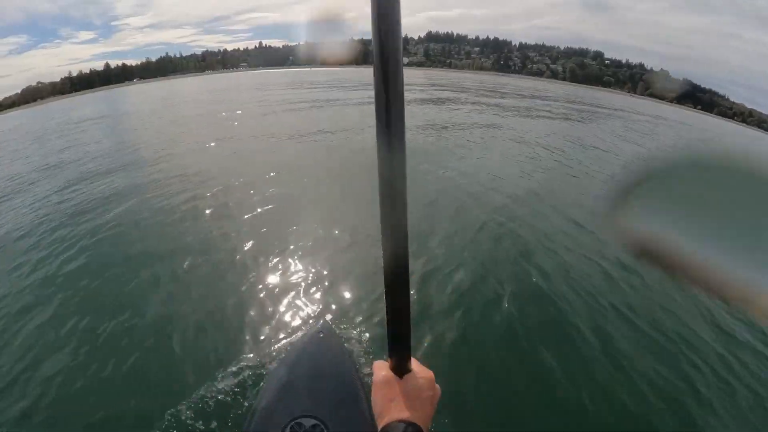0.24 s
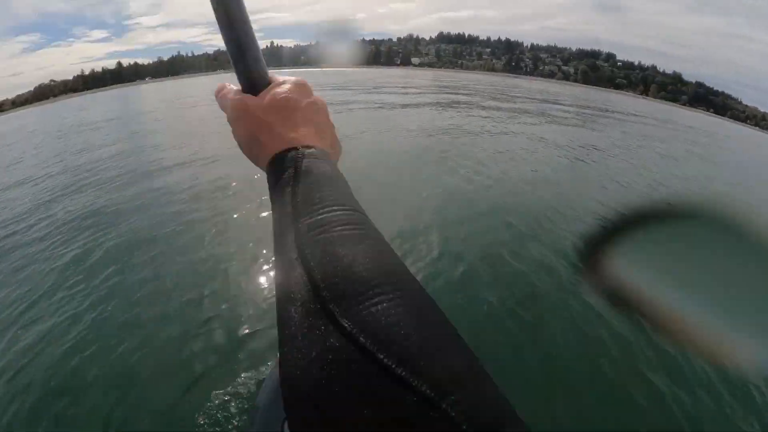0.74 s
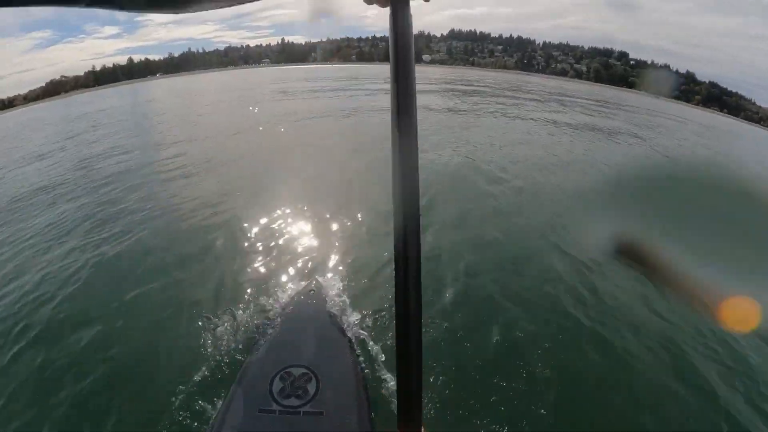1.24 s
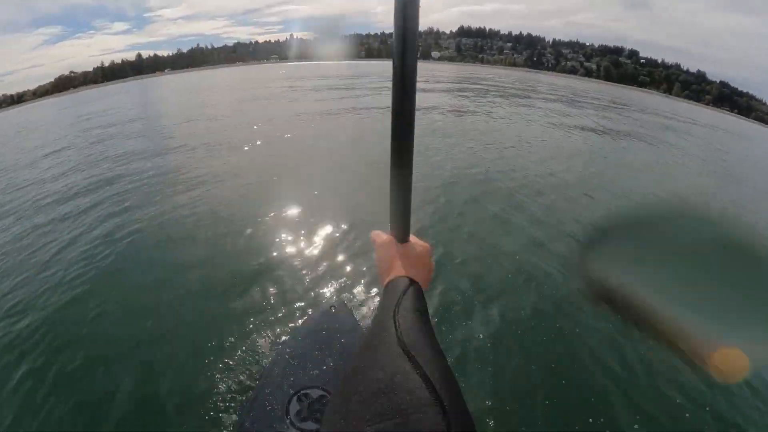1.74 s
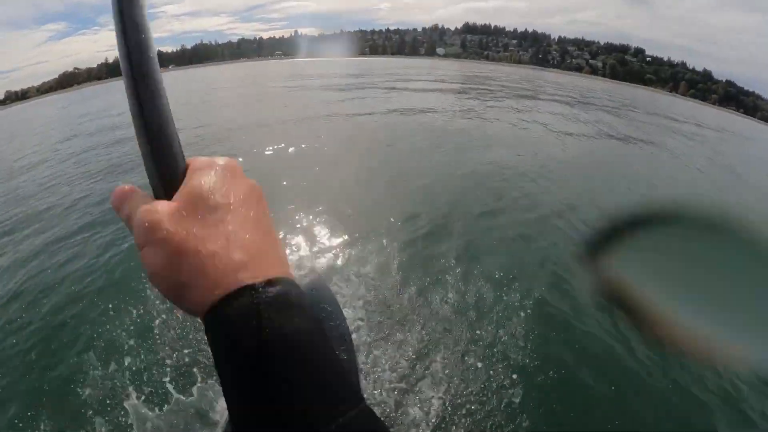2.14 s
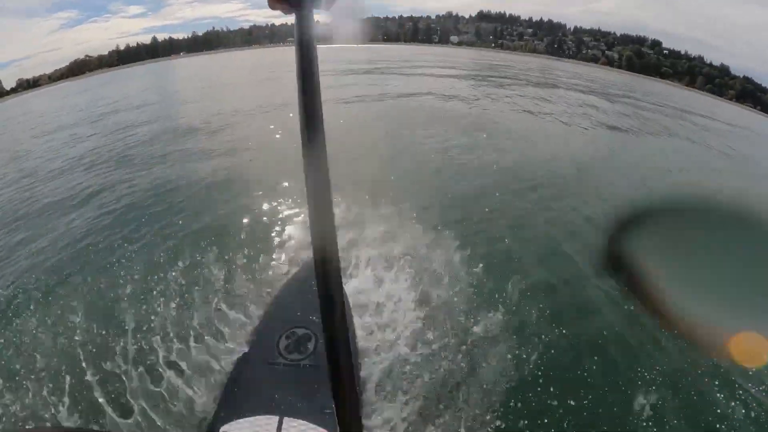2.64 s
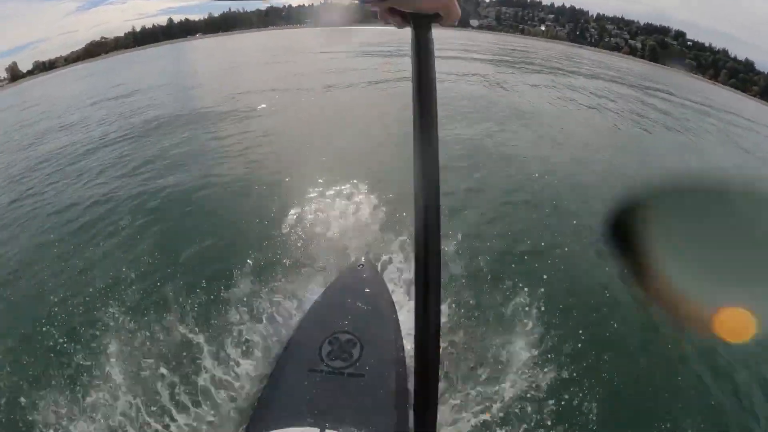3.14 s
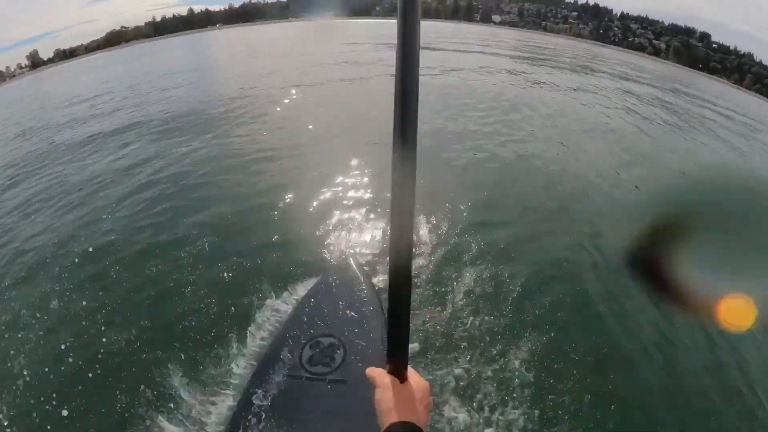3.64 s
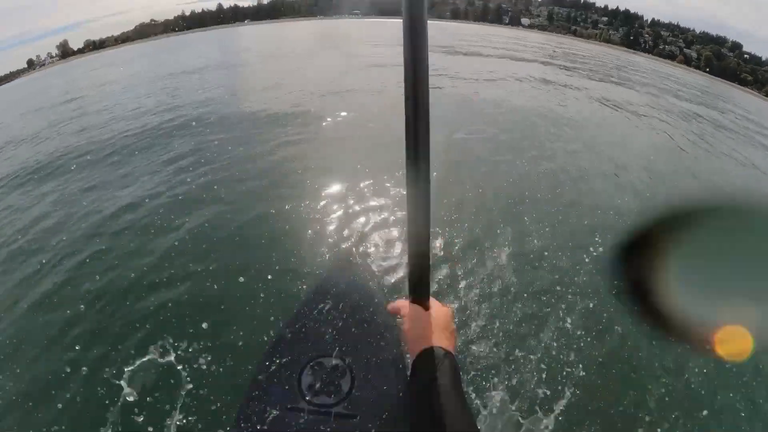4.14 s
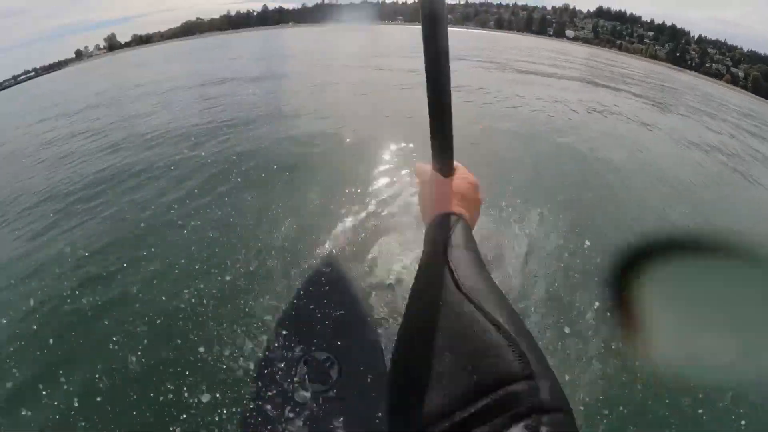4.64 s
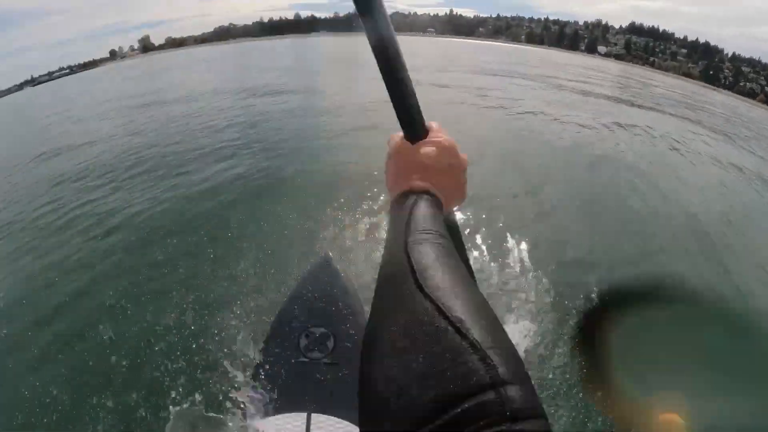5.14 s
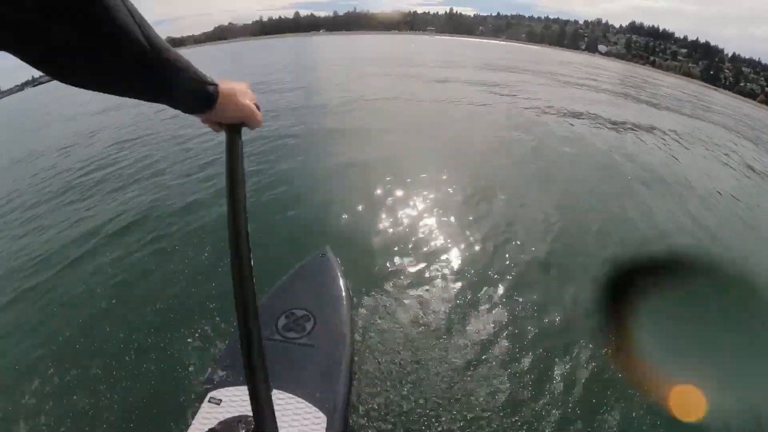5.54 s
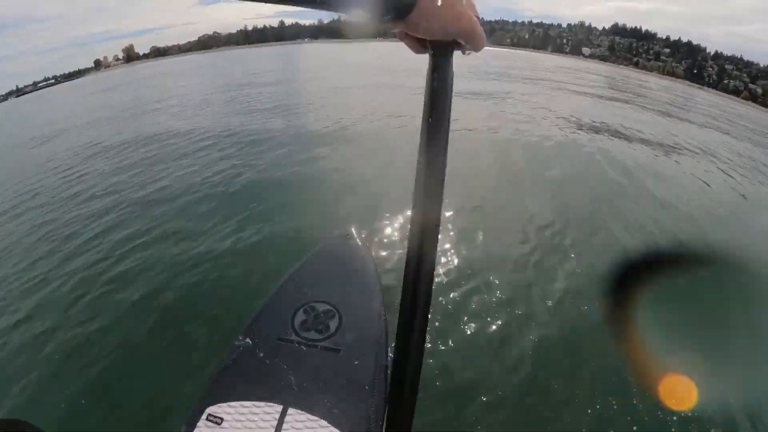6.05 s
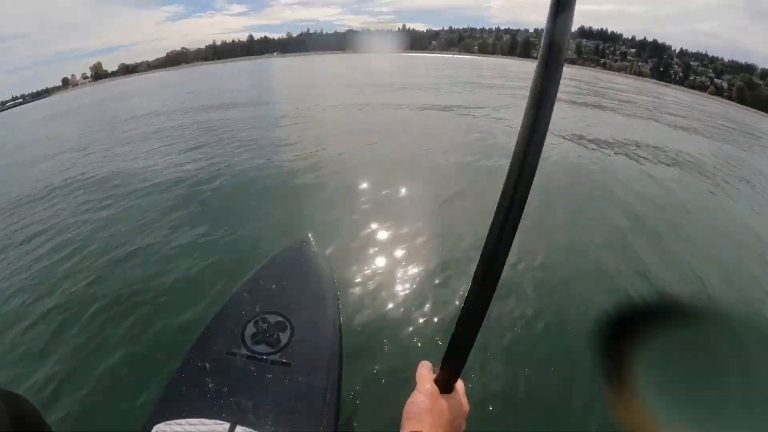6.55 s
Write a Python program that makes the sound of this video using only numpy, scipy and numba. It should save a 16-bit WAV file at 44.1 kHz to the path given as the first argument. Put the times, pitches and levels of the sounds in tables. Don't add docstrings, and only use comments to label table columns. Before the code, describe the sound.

Close, dull bow wash with deep paddle gulps and ringing air pockets, small droplet ticks, faint spray crackle and soft wind buffeting.

```python
import sys
import numpy as np
from scipy import signal
from scipy.fft import rfft, irfft
from scipy.io import wavfile
from scipy.ndimage import uniform_filter1d
from numba import njit

SR = 44100
rng = np.random.default_rng(int(sys.argv[2]) if len(sys.argv) > 2 else 0)


def voltage_ratio(decibels):
    exponent = np.asarray(decibels, float) / 20
    return 10 ** exponent


def bounce(signal):
    frames = np.transpose(np.atleast_2d(signal))
    limited = np.clip(frames, -1, 1)
    pcm = np.round(limited * 32767).astype(np.int16)
    wavfile.write(sys.argv[1], SR, pcm)


N = 299439


def unit(x):
    return x / np.sqrt(np.mean(x ** 2))


def curves(table):
    s, *columns = np.transpose(table)
    return [np.interp(np.arange(N) / SR, s, c, -140, -140) for c in columns]


def response(points):
    hz = np.arange(N // 2 + 1) * SR / N + 1e-3
    point_hz, point_db = np.transpose(points)
    return hz, voltage_ratio(np.interp(np.log(hz), np.log(point_hz), point_db, -150, -150))


def walk(rate):
    hold = int(SR / rate)
    steps = np.repeat(rng.standard_normal(N // hold + 1), hold)
    return unit(uniform_filter1d(uniform_filter1d(steps, hold), hold)[:N])


def surge(s, peak, length, rise):
    out = np.zeros(N)
    for start, a, decay in zip(s, peak, np.maximum(length, .003)):
        i = int(start * SR)
        t = np.arange(min(int(6 * decay * SR), N - i)) / SR
        attack = (1 - np.exp(-t / rise)) ** 2
        out[i:i + len(t)] += a * a * attack * np.exp(-2 * (t / decay) ** 2)
    return out


def swell(s, db, half_s):
    t = np.arange(N) / SR
    return sum(voltage_ratio(2 * a) * np.exp(-((t - centre) / w) ** 2) for centre, a, w in np.broadcast(s, db, half_s))


@njit
def bubbles(s, hz, cycles, size, glide, swell):
    out = np.zeros(N)
    for k in range(len(s)):
        tau = cycles[k] * SR / hz[k] / 3
        phase = 0.
        i0 = int(s[k] * SR)
        for i in range(min(int(5 * tau), N - i0)):
            phase += 2 * np.pi * hz[k] / SR * (1 + glide * i / (3 * tau))
            envelope = np.exp(-i / tau) * (1 - np.exp(-i / (swell * tau)))
            out[i0 + i] += size[k] * np.sin(phase) * envelope
    return out


def foam(count, lo_hz, hi_hz, cycles, scatter_db):
    when, pitch, strength, ringing = rng.random((count, 4)).T
    hz = (np.sqrt(lo_hz) + (np.sqrt(hi_hz) - np.sqrt(lo_hz)) * pitch) ** 2
    size = hz ** .45 * voltage_ratio(scatter_db * strength ** 2)
    return unit(bubbles(when * N / SR, hz, cycles * (.5 + ringing), size, 0.19, 0.57))


def water():
    # low_hz, high_hz
    zones_hz = [(75, 160), (160, 600), (600, 2000), (2000, 6000)]
    # point_hz, density_db (per
    # Hz)
    wash_colour = [(62, 3), (125, -6.5), (229, -3.5), (361, -2), (736, -11), (954, -13.5), (1260, -21.5),
                   (2000, -31.5), (2350, -36.5), (2850, -40), (3150, -44.5), (3800, -45), (4250, -57.5),
                   (7300, -66.5), (8800, -88.5)]
    # start_s, gurgle_db, fizz_db (against gurgle), length_s
    splashes = [(0.108, -34.5, -18, 0.091), (1.135, -32, -9, 0.024), (1.826, -18.5, -25, 0.03),
                (1.845, -15.5, -27.5, 0.037), (1.927, -13.5, -26.5, 0.034), (2.485, -18.5, -28, 0.076),
                (2.513, -26, -12.5, 0.034), (2.578, -15, -28, 0.025), (2.862, -18, -20, 0.015),
                (2.891, -13.5, -19.5, 0.022), (2.909, -17.5, -21, 0.034), (3.025, -21.5, -28, 0.049),
                (3.104, -18, -24, 0.042), (3.71, -23, -26, 0.042), (3.771, -24.5, -19.5, 0.06),
                (4.02, -20, -27, 0.035), (4.035, -15, -18, 0.042), (4.284, -16, -22.5, 0.046),
                (4.29, -21, -33, 0.024), (4.607, -17.5, -19.5, 0.03), (4.67, -32, -17, 0.099),
                (4.85, -27, -16, 0.035), (4.909, -24, -19, 0.041), (4.938, -26.5, -17, 0.039),
                (5.491, -29, -14, 0.031), (5.617, -20, -30, 0.058), (5.661, -27, -22, 0.038),
                (6.114, -18.5, -20.5, 0.037), (6.153, -22.5, -22, 0.065), (6.331, -25, -21, 0.038),
                (0.931, -26.5, -14, 0.057), (1.066, -29, -13, 0.026), (5.518, -27, -26, 0.05),
                (6.525, -22, -15.5, 0.018)]
    # start_s, gurgle_db, fizz_db (against gurgle)
    ticks = [(0.3152, -46, 0.5), (0.382, -31, -25), (0.428, -29, -22), (0.462, -35.5, -12), (0.684, -50, 0),
             (0.816, -45, -6), (0.9032, -31, -13), (0.957, -35, -14), (1.068, -33, -17),
             (1.3982, -38.5, -11), (1.5094, -44, 0), (1.552, -31.5, -13.5), (1.81, -29, -20),
             (2.339, -20.5, -28), (2.5127, -29, -16), (2.409, -25, -21), (2.826, -30, -22),
             (2.866, -21, -31), (2.8922, -17, -25), (2.898, -16.5, -24), (3.013, -28, -25),
             (3.034, -24, -28), (3.083, -32, -22), (3.655, -32, -17), (4.052, -23, -17), (1.936, -27, -26),
             (6.516, -37, -18), (6.762, -30, -22), (3.569, -20, -40), (3.717, -24.5, -23),
             (4.0427, -31, -24), (4.2793, -28, -22), (4.608, -27.5, -25), (5.963, -25, -27),
             (5.4091, -35, -16), (6.119, -25, -16), (6.262, -28, -19), (6.642, -31.5, -14.5)]
    # centre_s, level_db, half_length_s, centre_hz, half_width_hz
    clearings = [(5.1, 5.5, 0.56, 4300, 350), (1.05, -1.5, 0.42, 5200, 730), (4.3, 2.5, 0.17, 4300, 400),
                 (6.25, -0.5, 0.12, 2800, 250)]

    s, low_db, _, length = slaps()
    bursts = [surge(s, voltage_ratio(db), length, 0.0034) for db in (low_db - 18.0, low_db - 8.5)]
    s, mid_db, high_db, length = np.transpose(splashes)
    bursts += [surge(s, voltage_ratio(db), length, 0.0066) for db in (mid_db - 3.0, mid_db + high_db - 4.0)]
    s, mid_db, high_db = np.transpose(ticks)
    tick_s, tick_rise_s = 0.01 + 0 * s, 0.0015
    bursts[2] += surge(s, voltage_ratio(mid_db + 2.0), tick_s, tick_rise_s)
    bursts[3] += surge(s, voltage_ratio(mid_db + high_db + 3.5), tick_s, tick_rise_s)

    hz, gain = response(wash_colour)
    crowd = foam(count=13000, lo_hz=119.87, hi_hz=6008.0, cycles=12.22, scatter_db=11.0)
    source = rfft(0.93 * rng.standard_normal(N) + 0.51 * crowd) * gain
    power = np.abs(source) ** 2 * 2 / N ** 2
    zone_db = []
    for (lo, hi), flow, burst in zip(zones_hz, wash(), bursts):
        zone_power = power[(hz > lo) & (hz < hi)].sum()
        zone_db.append(10 * np.log10((flow + burst) / zone_power))

    out = 0
    shared = walk(24.916)
    for centre in 60 * 2 ** (np.arange(16) / 2):
        mask = np.cos(np.pi / 2 * np.clip(2 * np.log2(hz / centre), -1, 1)) ** 2
        place = np.interp(np.log(centre), np.log([110, 300, 1000, 3000]), np.arange(4))
        j = min(int(place), 2)
        db = zone_db[j] + (place - j) * (zone_db[j + 1] - zone_db[j])
        flicker_db = 0.85 * shared + 1.32 * walk(14)
        out = out + irfft(source * mask, N) * voltage_ratio(db + flicker_db)
    for s, db, half, centre_hz, width_hz in clearings:
        edge = irfft(source * np.exp(-((hz - centre_hz) / width_hz) ** 2), N)
        out = out + edge * voltage_ratio(zone_db[3]) * np.sqrt(swell(s, db, half))
    return out


def wash():
    # time_s, level_db, brightness_db
    flow = [(0, -40, 3.5), (0.24, -43.5, 7.5), (0.72, -36, -1), (1.2, -35.5, 1.5), (1.5, -31.5, -1.5),
            (2.0, -34, -1), (2.4, -34, 1), (2.76, -35.5, 0.5), (3.27, -34, -4.5), (3.5, -35.5, 1),
            (4.0, -38.5, 2), (4.45, -39, 2.5), (4.75, -36.5, 1), (5.33, -40, 1.5), (5.9, -40.5, 3.5),
            (6.25, -40, -6), (6.6, -38, 0.5), (6.79, -38.5, 8)]
    flow_db = (-7.5, 2, 0.5, -18.5)
    bright_share = (0.19, -0.19, .05, 0.9)
    # centre_s, churn_db, gurgle_db (against churn), half_length_s
    swirls = [(0.43, -29, -12.5, 0.16), (0.994, -33, 8, 0.049), (1.32, -31, 2.5, 0.081),
              (1.88, -31, -13, 0.069), (2.208, -34, 2, 0.11), (2.592, -23.5, -16.5, 0.088),
              (3.127, -23, -4.5, 0.053), (3.718, -35.5, 4.5, 0.088), (3.86, -31, -13, 0.1),
              (4.217, -26.5, -3, 0.039), (4.454, -33.5, -17, 0.11), (5, -34, 2.5, 0.063),
              (5.53, -31.5, 3, 0.041), (5.639, -17.5, -17, 0.062), (6.072, -26, -22, 0.019),
              (6.239, -25, -0.5, 0.082), (6.356, -33, 4, 0.078), (6.782, -49, 9, 0.026)]
    # centre_s, level_db
    thuds = [(0.5, -26.5), (0.72, -29), (1.06, -33), (1.63, -32.5), (1.92, -24.5), (2.6, -35),
             (2.89, -27.5), (3.14, -22.5), (3.57, -33), (3.72, -28.5), (4.03, -28), (4.31, -22),
             (4.97, -29), (5.53, -27), (6.13, -25.5), (6.44, -24.5), (6.73, -27)]

    level, bright = curves(flow)
    thud, churn, gurgle, fizz = (voltage_ratio(2 * (level + db + share * bright))
                                 for db, share in zip(flow_db, bright_share))
    s, db, gurgle_db, half = np.transpose(swirls)
    froth = swell(s, db + gurgle_db, half)
    thud = thud + swell(*np.transpose(thuds), half_s=0.043)
    churn = churn + swell(s, db, half)
    return thud, churn, gurgle + froth, fizz + froth * voltage_ratio(2 * -24)


def slaps():
    # start_s, level_db, pitch_hz, length_s
    gulps = [(1.044, -11, 121, 0.017), (1.829, -13, 372, .03), (1.855, -5.5, 336, .036),
             (1.928, -8.5, 218, 0.032), (2.495, -14.5, 518, .035), (2.523, 2, 223.5, 0.0384),
             (2.581, -13.5, 448, 0.03), (3.108, -4.5, 277, 0.025), (3.136, -5, 300, 0.027),
             (3.655, -10, 203, 0.0083), (3.716, 0, 290, 0.015), (3.775, -11, 324, 0.037),
             (4.289, -16, 368, 0.02), (4.302, -0.5, 200, 0.02), (4.865, -7.5, 227, 0.031),
             (4.919, -19.5, 248, .033), (4.946, 1, 231, 0.02), (4.99, -10, 350, 0.02),
             (5.519, -14, 350, .03), (5.631, -19, 288, 0.033), (5.644, -11.5, 520, 0.036),
             (6.031, -13, 404, 0.029), (6.124, -8, 439, 0.0256)]
    # start_s, level_db, pitch_hz
    laps = [(1.292, -21, 440), (0.149, -15, 378), (0.334, -17, 148), (0.536, -18.5, 428), (0.904, -15, 200),
            (1.141, -15, 290), (2.422, -17, 447), (2.859, -32, 570), (2.889, -31, 544), (3.026, -29, 123),
            (3.208, -19, 560), (4.015, -17, 486), (4.039, -24, 625), (4.526, -15.5, 490),
            (4.605, -19.5, 577), (5.071, -13.5, 169), (5.099, -16, 217), (5.496, -16, 245),
            (5.981, -19, 163), (6.258, -12.5, 500)]
    s, db, hz = np.transpose(laps)
    lap_s = 0.03 + 0 * s
    return np.hstack([np.transpose(gulps), np.array([s, db, hz, lap_s])])


def pockets():
    # start_s, level_db, pitch_hz, ringing_cycles
    plops = [(0.5295, -14.5, 960, 9.6), (0.709, -16.5, 755, 12), (1.006, -7.5, 826, 5.2),
             (1.122, -14, 772, 14), (1.142, -7, 776, 5.9), (1.666, -13, 924, 23), (1.743, -11, 580, 5),
             (0.982, -12.5, 510, 12), (1.526, -14, 616, 10), (1.83, -16, 713, 6), (1.934, -14, 630, 5.4),
             (2.865, -9, 562, 8.6), (3.11, -13.5, 616, 8.1), (3.714, -17, 624, 5), (3.886, -20, 810, 7.6),
             (4.61, -12, 602, 8.2), (4.916, -20, 770, 8), (6.027, -17, 480, 5), (6.516, -14, 560, 6),
             (2.009, -13.5, 820, 9.5), (2.207, -15.5, 920, 8.3), (2.243, -16, 933, 12),
             (2.283, -18, 880, 5), (2.339, -13, 930, 24), (2.381, -15.5, 805, 11), (2.713, -22, 834, 16),
             (2.9, -13.5, 963, 43), (3.034, -13, 820, 4), (3.312, -13.5, 830, 7.7), (3.571, -27, 543, 8.1),
             (5.4555, -19.5, 1076, 18), (5.561, -10, 920, 16), (5.624, -15, 1000, 10),
             (5.917, -14, 940, 4.8), (6.052, -14.5, 663, 7), (6.12, -8.5, 937, 12), (6.3397, -22, 913, 32),
             (1.866, -7.5, 370, 6.9), (1.94, -10, 377, 7), (1.95, -13, 704, 6), (2.296, -12.5, 500, 7),
             (2.428, -17, 448, 11.6), (4.303, -5.5, 299, 5.7), (4.31, -11, 478, 7.4), (4.915, -13, 244, 8),
             (5.16, -37, 3400, 17), (5.67, -14, 331, 9), (6.142, -7.5, 383, 8), (6.19, -16, 800, 10),
             (0.104, -22.5, 335, 16), (0.41, -17, 189, 9), (0.455, -15.5, 121, 9.8), (1.874, -8, 193, 6),
             (2.375, -17.5, 225, 6.4), (3.475, -18, 45, 3.7), (3.576, -14, 209.5, 14), (3.93, -20, 432, 35),
             (4.868, -10.5, 225, 23), (5.568, -8, 354, 14), (5.635, -14, 279, 19)]
    # start_s, level_db, pitch_hz
    plinks = [(0.818, -32, 1750), (0.9033, -26.5, 1870), (1.1418, -33.5, 1810), (2.151, -23.5, 1300),
              (2.3443, -22, 1430), (2.872, -27, 2000), (2.8992, -12.5, 1470), (2.925, -29.5, 1950),
              (0.3805, -42, 1460), (2.908, -24, 1500), (1.068, -36, 1440), (1.8108, -30.5, 1320),
              (2.513, -28, 1480), (2.826, -31, 1410), (2.865, -23, 1380), (3.0001, -33, 1360),
              (3.0125, -28.5, 1590), (3.034, -27, 1450), (4.6083, -29, 1340), (5.6255, -32, 1420),
              (6.762, -29, 1370), (3.7733, -45, 3290), (5.793, -36.5, 1820), (5.9866, -25.5, 1230),
              (6.119, -44, 3240), (6.2653, -25, 1710)]

    s, db, hz, length = np.repeat(slaps(), repeats=4, axis=1)
    count = len(s) // 4
    delay, detune = rng.random((len(s), 2)).T
    when = s + length * np.tile([0.01, .12, .35, .7], count) * (.7 + .6 * delay)
    size = voltage_ratio(db + np.tile([3.0, -12.5, -1.5, -14.0], count))
    hz = hz * np.tile([1.015, 1.6, .9, 1.3], count) * (0.899 + 0.14 * detune)
    rings = bubbles(when, hz, .5 * length * hz + 0.69, size, 0.12, 0.38)
    s, db, hz, cycles = np.array(plops).T
    rings = rings + bubbles(s, hz, cycles, voltage_ratio(db + 1.5), 0.092, 0.43)
    s, db, hz = np.transpose(plinks)
    plink_s = 0.008
    rings = rings + bubbles(s, hz, plink_s * hz, voltage_ratio(db + 6.5), 0.051, 0.2)
    return signal.sosfilt(signal.butter(4, 4200, fs=SR, output="sos"), rings)


def droplets():
    # start_s, level_db, pitch_hz
    drips = [(0.1331, -41, 2270), (0.2992, -43.5, 2090), (0.4604, -40, 2680), (0.7876, -34, 2200),
             (0.818, -41, 2020), (0.9028, -23, 2030), (1.069, -36, 2210), (1.1418, -32, 2200),
             (1.1927, -39, 2500), (1.3259, -28, 2090), (1.6312, -42, 2200), (1.8537, -35, 2000),
             (2.1121, -35, 2000), (2.2428, -40, 2250), (2.3451, -33, 2110), (2.3999, -34, 2210),
             (2.4244, -30, 2080), (2.4887, -40.5, 2090), (2.5132, -41, 2590), (2.7656, -37, 2070),
             (2.8654, -23, 2110), (2.8973, -22, 2160), (2.9248, -37, 2000), (3.033, -41, 2010),
             (3.7733, -38, 2290), (3.7853, -30.5, 2030), (4.0432, -27, 2020), (4.2951, -38, 2010),
             (4.6084, -32, 2020), (4.6668, -33, 2040), (4.8599, -43, 2060), (4.8753, -33.5, 2160),
             (5.1597, -49, 2060), (5.5114, -41, 2050), (5.9638, -42, 2120), (6.109, -39, 3050),
             (6.1205, -31, 2790), (6.2637, -32, 2600), (6.5326, -44, 2100), (6.6413, -41, 2210)]
    # start_s, level_db, pitch_hz
    pings = [(0.1042, -59, 4200), (0.194, -64, 4250), (0.3132, -59, 4350), (0.3416, -53, 4230),
             (0.417, -57, 4200), (0.7677, -58, 4240), (0.7816, -52, 4480), (0.823, -56, 4820),
             (0.9028, -57, 4450), (0.9373, -53, 4300), (0.9547, -46, 4390), (0.9767, -56, 4330),
             (1.1418, -56, 4730), (1.3833, -59, 4460), (1.3977, -49, 5290), (1.502, -43, 4270),
             (1.5549, -58, 4400), (1.92, -58, 4200), (2.5122, -56, 4330), (2.8674, -56, 4580),
             (2.8998, -57, 4220), (3.0629, -58, 4230), (3.7174, -58, 4310), (4.0243, -62, 4370),
             (4.0397, -54, 4380), (4.0517, -43, 4180), (4.2961, -50, 4620), (4.372, -58, 4220),
             (4.6109, -57, 4590), (4.6229, -52, 4270), (4.9741, -60, 4270), (5.2026, -64, 4250),
             (5.4016, -47, 4200), (5.4944, -56, 4300), (5.6226, -60, 4240), (5.9638, -62, 4480),
             (6.1125, -56, 4590), (6.1225, -56, 4320), (6.2612, -56, 4210), (6.3634, -60, 4470),
             (6.4014, -53, 4260), (6.4612, -47, 4210), (6.6413, -52, 4300), (6.7087, -60, 4310),
             (6.7311, -58, 4490)]
    out = 0
    for table, length_s in ((drips, 0.0046), (pings, 0.0036)):
        s, db, hz = np.transpose(table)
        cycles = length_s * hz
        out = out + bubbles(s, hz, cycles, voltage_ratio(db + 5.0), 0.033, 0.49)
        out = out + bubbles(s + .0015, hz, cycles, voltage_ratio(db - 2.5), 0.1, 0.53)
    return signal.sosfilt(signal.butter(4, 6500, fs=SR, output="sos"), out)


def spray():
    # time_s, level_db
    mist_levels = [(1.72, -108), (1.85, -86.5), (2.27, -71.5), (2.46, -83), (2.52, -67.5), (2.95, -69.5),
                   (3.02, -77), (3.1, -69.5), (3.32, -77), (3.39, -68.5), (3.73, -85), (4.28, -72.5),
                   (4.66, -70), (5.3, -74), (5.37, -84), (5.5, -68), (6.22, -74), (6.42, -95)]
    # start_s, level_db
    spatters = [(2.842, -45), (2.8655, -30.5), (2.8945, -33), (2.915, -44), (3.064, -46), (4.0207, -51),
                (4.0405, -40), (4.051, -33.5), (4.371, -51), (4.5924, -52), (4.613, -28.5), (4.64, -43.5),
                (4.682, -51), (5.4947, -45.5), (5.6493, -55), (5.832, -52), (6.0173, -55), (6.111, -54),
                (6.1224, -44)]
    # point_hz, density_db (per Hz)
    spray_colour = [(10500, -59), (11000, -29.5), (11500, -7.5), (12100, 4.5), (12600, 0), (13600, -12.5),
                    (15780, -16)]

    drops = (rng.random(N) < .03) * rng.standard_normal(N) * voltage_ratio(3 * rng.exponential(size=N))
    hz, gain = response(spray_colour)
    crackle = rfft(rng.standard_normal(N) + .6 * unit(drops)) * gain
    level_db = curves(mist_levels)[0]
    mist = unit(irfft(crackle, N)) * voltage_ratio(level_db + 1.8 * walk(40))
    veil = unit(irfft(crackle * (hz > 13000), N)) * voltage_ratio(level_db - 13.0 + 6.5 * walk(12))
    tilt = voltage_ratio(10.5 * (hz - 12000) / 3500)
    bright = unit(irfft(crackle * tilt, N))
    s, db = np.transpose(spatters)
    bursts = surge(s, voltage_ratio(db - 14), length=0.0095 + 0 * s, rise=.0028)
    return mist + veil + bright * np.sqrt(bursts)


def wind():
    # point_hz, density_db (per Hz)
    gust_colour = [(4.7, -32.5), (8.0, 7), (31, 4.5), (46, -0.5), (86, -14), (140, -18.5), (180, -47.5),
                   (310, -120)]
    # centre_s, level_db, half_length_s
    puffs = [(0.12, -27.5, 0.18), (0.664, -22, 0.025), (0.935, -18.5, 0.15), (1.64, -17, 0.048),
             (1.778, -14, 0.042), (1.942, -16, 0.023), (2.123, -17, 0.021), (2.33, -16, 0.04),
             (2.457, -13, 0.043), (2.55, -21.5, 0.045), (2.759, -18.5, 0.022), (2.927, -13, 0.038),
             (3.056, -9, 0.023), (3.134, -16.5, 0.025), (3.318, -14.5, 0.034), (3.618, -20, 0.039),
             (3.812, -24, 0.045), (4.174, -18, 0.084), (4.313, -18, 0.022), (4.523, -19.5, 0.024),
             (4.76, -16, 0.061), (4.926, -18.5, .03), (5.094, -19.5, 0.045), (5.211, -15, 0.018),
             (5.416, -25, 0.19), (5.752, -22, 0.055), (5.959, -20.5, 0.042), (6.163, -16.5, .03),
             (6.535, -17.5, 0.14), (6.75, -15.5, 0.027)]
    lumps = unit(irfft(rfft(rng.standard_normal(N)) * response(gust_colour)[1], N))
    lull_db = -34
    power = voltage_ratio(2 * lull_db) + swell(*np.transpose(puffs))
    return lumps * np.sqrt(power) * voltage_ratio(1.2 * walk(13))


def scene():
    return (water() + pockets() + droplets() + spray() + wind())[None, :]


def low_pass(x):
    return signal.sosfilt(signal.butter(12, 15780, fs=SR, output="sos"), x)


def record(dry):
    mix = np.tanh(0.75 * dry) / 0.86 + .0019
    return low_pass(mix)


dry = scene()
out = record(dry)
bounce(out)
```